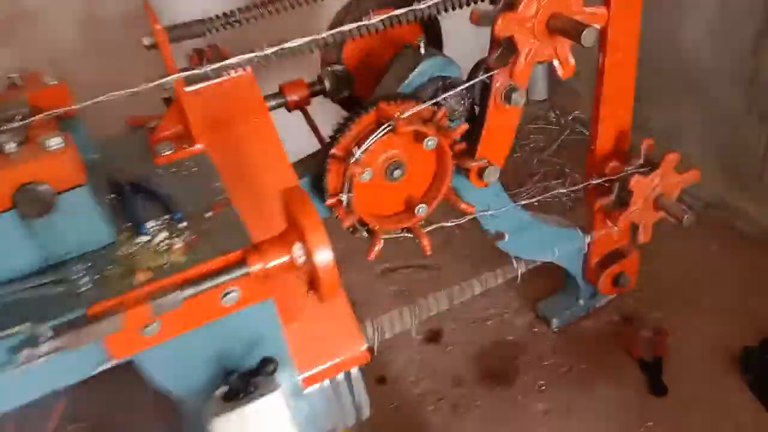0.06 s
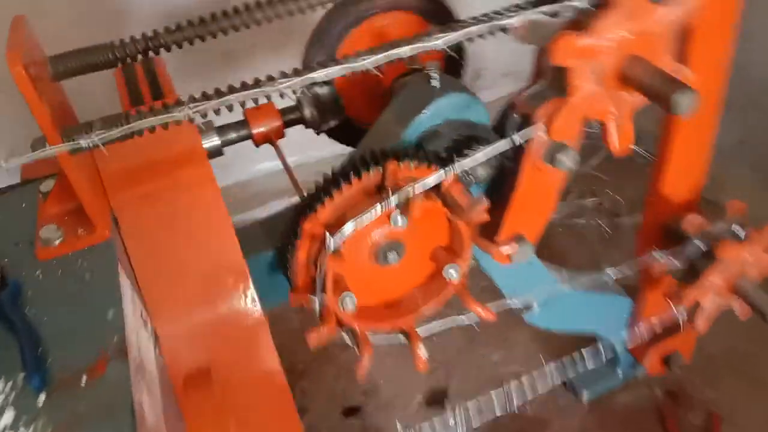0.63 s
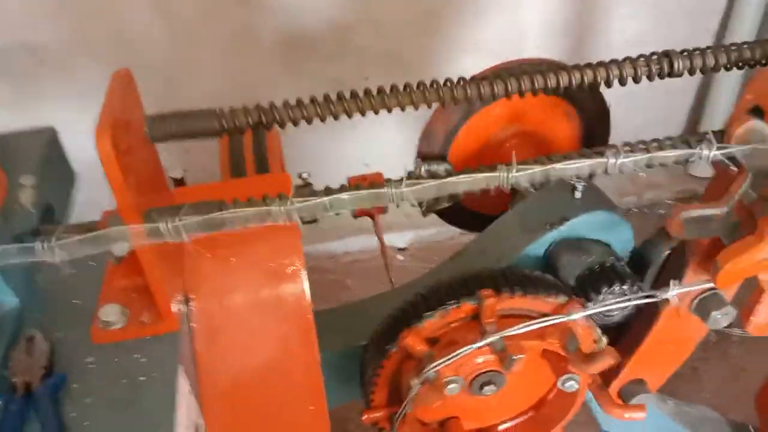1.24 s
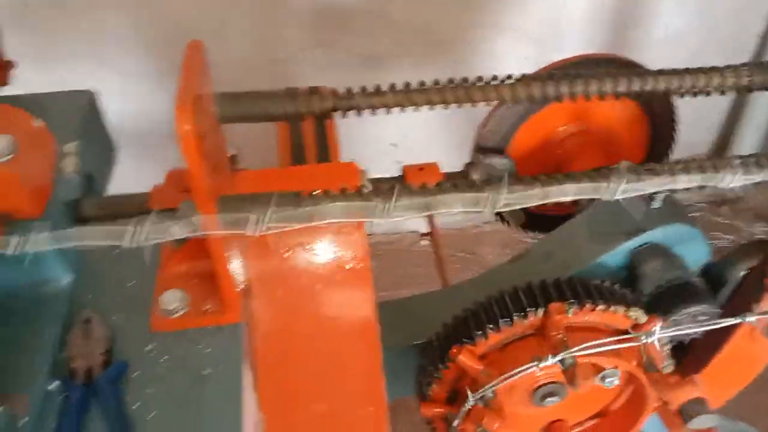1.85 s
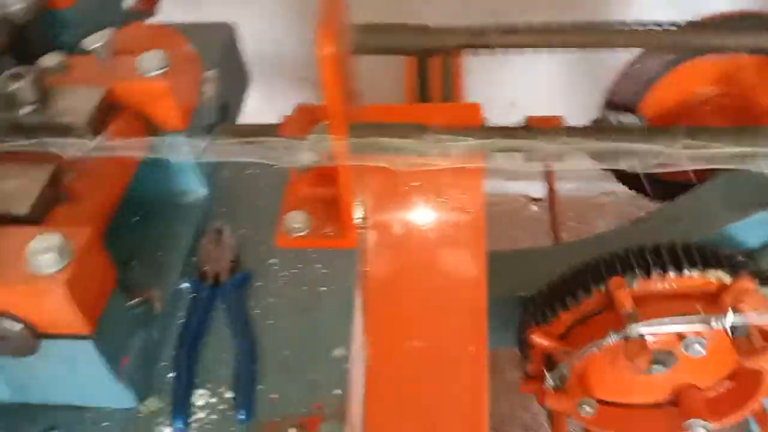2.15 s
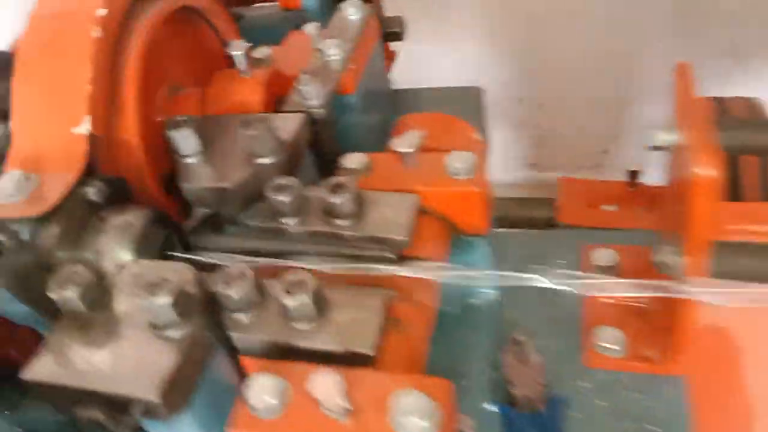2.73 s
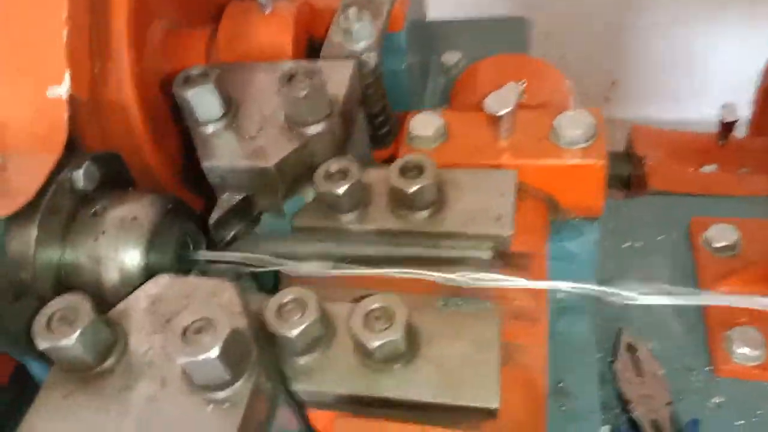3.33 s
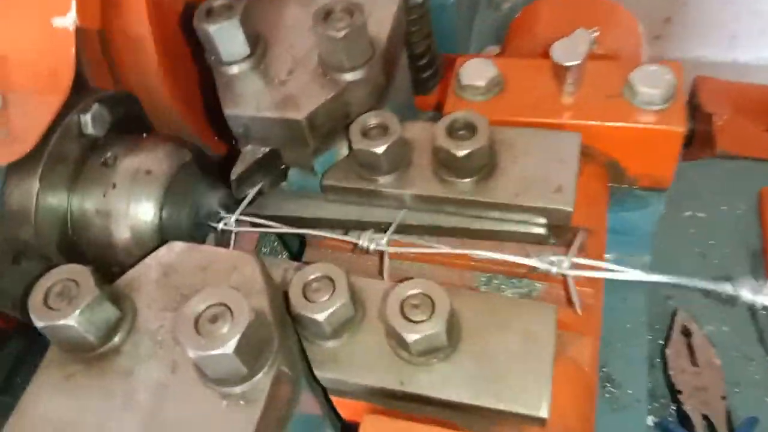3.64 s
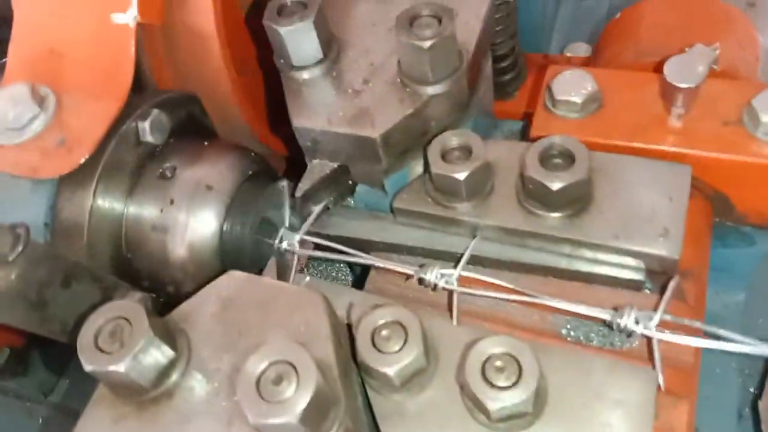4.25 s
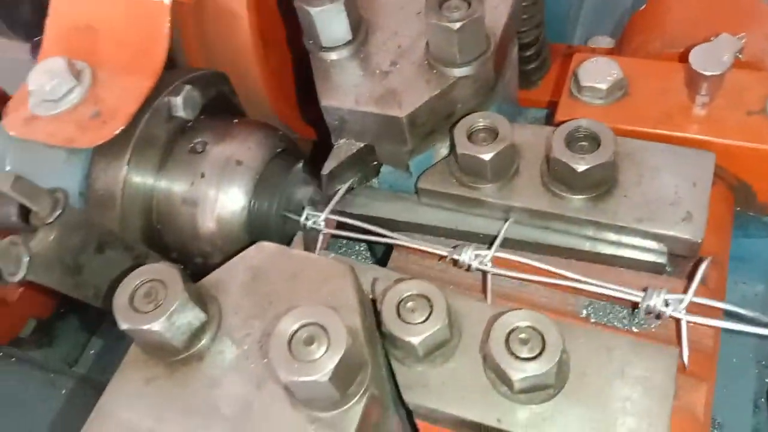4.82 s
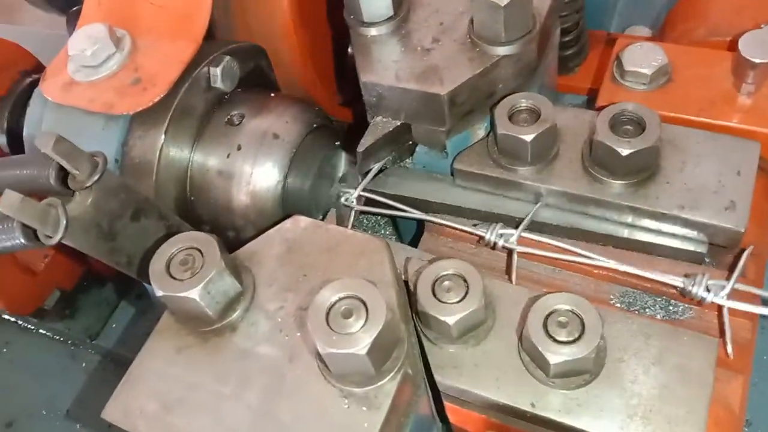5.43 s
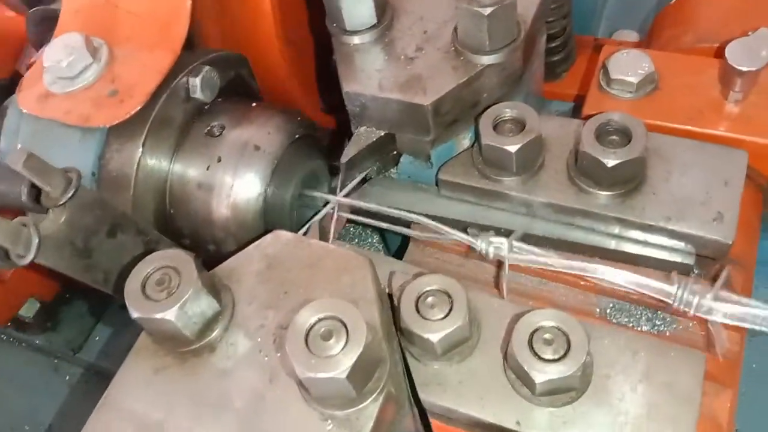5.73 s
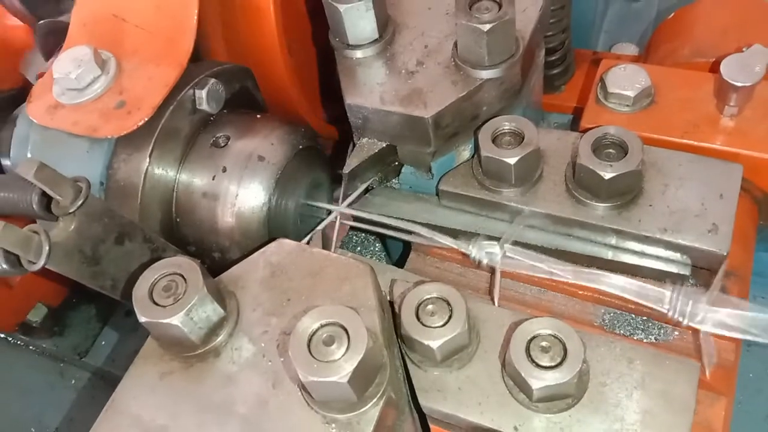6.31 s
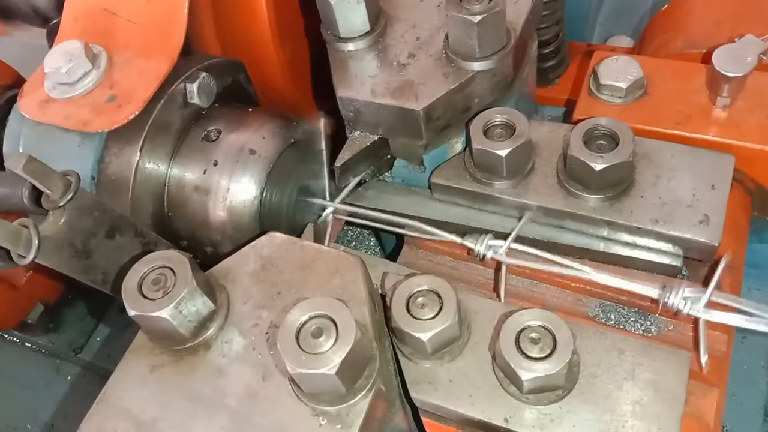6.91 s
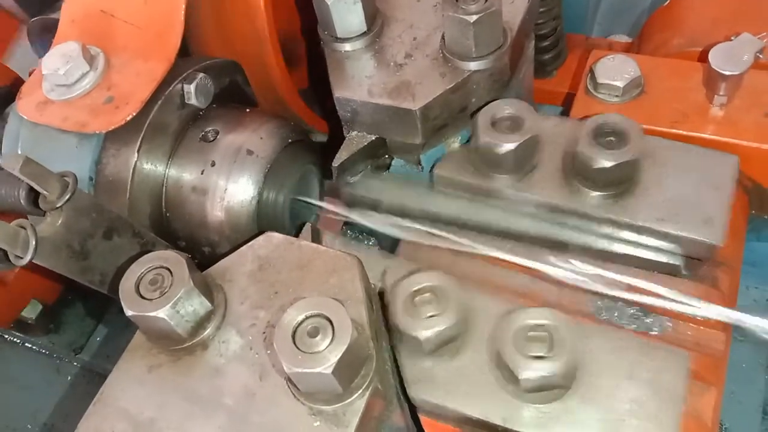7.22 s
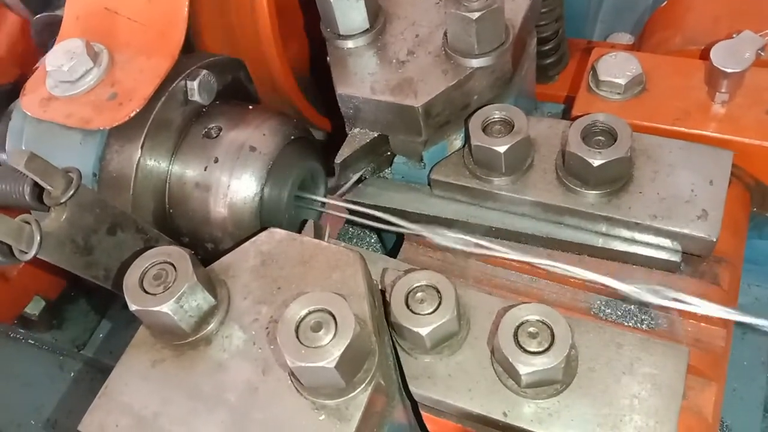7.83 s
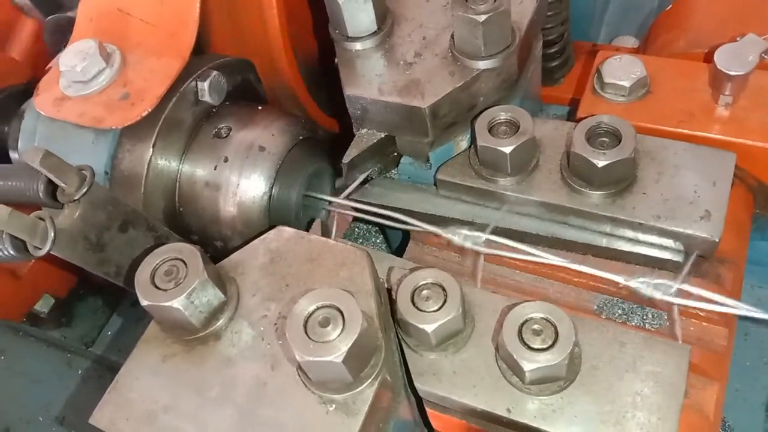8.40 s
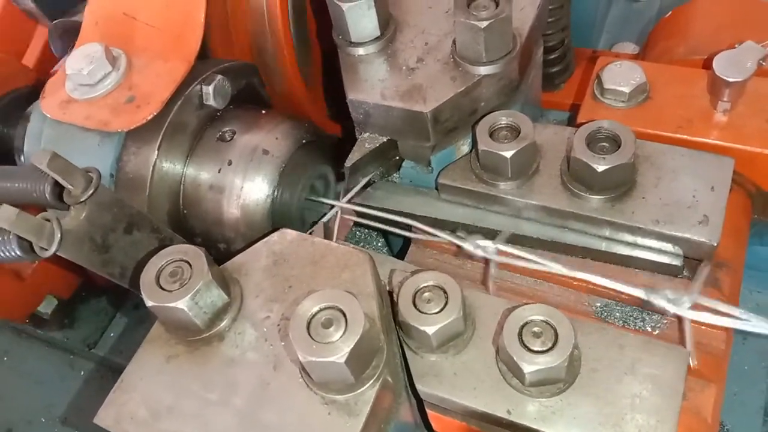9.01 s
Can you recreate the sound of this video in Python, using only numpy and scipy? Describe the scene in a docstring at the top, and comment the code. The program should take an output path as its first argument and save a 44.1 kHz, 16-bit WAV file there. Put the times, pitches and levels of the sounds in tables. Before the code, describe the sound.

A barbed wire machine runs without a break in a small workshop. Its motor rumbles and its gears grind while a group of three sharp steel clacks repeats almost twice a second, the third lighter. Between the clacks, wire scrapes with a hiss and ticks quickly round the strand. The drone eases over the first few seconds as the microphone moves from the drive end to the cutting head, leaving the close clacks more prominent.

```python
"""Barbed wire machine

In a small workshop a machine makes one barb every 0.56 s over grinding gears and a rumbling motor.
Each stroke excites the damped modes of its steel parts three times: the feed strikes, the cutter shears
and the lever drops back. Between the first two clacks the wire scrapes in and ticks round the strand.
The microphone moves from drive end to cutting head; its look-ahead limiter ducks the drone at each clack."""
import sys
import numpy as np
from scipy import signal
from scipy.fft import rfft, irfft, next_fast_len
from scipy.io import wavfile
from scipy.ndimage import uniform_filter1d, minimum_filter1d

SR = 44100
rng = np.random.default_rng(int(sys.argv[2]) if len(sys.argv) > 2 else 0)


def store_pcm(level_fs):
    """Save levels as 16-bit WAV."""
    pcm = np.round(np.clip(level_fs, -1, 1) * 32767).astype(np.int16)
    wavfile.write(sys.argv[1], SR, np.atleast_2d(pcm).T)


N = 399546
TIME = np.arange(N) / SR
FIRST_STROKE_S, STROKE_S = .2762, .55987
STROKES = (TIME - FIRST_STROKE_S) / STROKE_S

# Spectral densities of the running parts: f/Hz, relative level/dB
MOTOR_SPECTRUM = [(20, -25), (38, -13), (62, -20), (115, -3), (270, -1.5), (400, -0.5), (750, 0), (1200, 0),
                  (3000, -16), (8000, -66)]
GEAR_SPECTRUM = [(100, -38.5), (600, -13.5), (1000, -3.5), (1300, 1.5), (1680, 4), (1870, 7.5),
                 (2020, -4.5), (2200, -8), (2650, -14.5), (2950, -11), (3350, -9.5), (3900, -16.5),
                 (6000, -24), (12000, -34.5)]
SCRAPE_SPECTRUM = [(1500, -34), (3000, -10), (4100, -11), (4800, 1.5), (5400, 5), (5900, 2.5), (6650, 5.5),
                   (7500, 0), (8400, -11.5), (9800, -14), (11500, -17.5), (15200, -24)]
FIZZ_SPECTRUM = [(5000, -10), (8000, 1), (9800, 2.5), (11300, -5), (13100, 0), (14000, -4), (14900, 1),
                 (16000, -11)]
FLICK_SPECTRUM = [(2000, -47), (5000, -2), (6500, 11.5), (8500, 3.5), (9750, -6), (10900, -1), (12300, -22),
                  (13150, 7), (14000, -6), (14900, -1), (16000, -23)]
# Motor tones: f/Hz, bandwidth/Hz, level/dB relative to the rumble
HUM_TONES = [(234, 15, -19.5), (275.4, 8.7, -16), (1840, 45, -8), (2406, 10, -13)]
# Whines and parts kept ringing by the running: f/Hz, bandwidth/Hz, level/dB
WHINE_TONES = [(632, 2.2, -46), (1555, 9.4, -39), (2290, 10, -42.5), (3746, 12, -46.5), (5420, 37, -42.5)]
# Gear meshes: teeth per stroke, strength
GEAR_MESHES = [(53, .8), (86, .7)]
# Gear load as the barb is wound and the lever lifted: t/s into the stroke, half-width/s, gain/dB
LOAD_SWELLS = [(0.087, .06, 2), (0.443, 0.041, 2)]
# Friction as the wire is drawn in, wound, sheared, pulled on and set again:
# t/s into the stroke, half-width/s, scrape gain/dB, fizz gain/dB
RUB_SWELLS = [(0.072, 0.04, 9, 10), (0.168, 0.1, 2.5, 12.5), (0.32, 0.058, 6.5, 19.5),
              (0.426, 0.057, 3.5, -7), (0.516, .014, -0.5, 13.5)]
# Squeals of rubbing steel: t/s, duration/s, f/Hz, level/dB
STEEL_SQUEALS = [(.22, 0.055, 3820, -31), (2.292, 0.23, 5350, -34), (2.941, 0.076, 3746, -33),
                 (3.182, 0.083, 3746, -36), (8.843, .08, 3746, -35)]
# Modes of the struck parts: f/Hz, relative level/dB, T60/s
BARB_MODES = [(9750, -5, .02), (13100, -7, .016), (14900, -8, .016)]
CUT_END_MODES = [(4800, -29, .05), (10800, -31.5, 0.032), (12200, -30, .06)]
BED_MODES = [(105, -34, 0.018), (182, -19.5, 0.042), (332, -41, 0.014)]
FEED_MODES = [(1472, -26, 0.081), (1775, -14, 0.081), (2220, -18, 0.049), (6960, -12, 0.023),
              (10300, -19, 0.015), (12100, -23, 0.016), (14550, -19, .012)]
CUTTER_MODES = [(1874, -7.5, 0.024), (2603, -12, 0.016), (3293, -17, 0.034), (6830, -24, 0.023)]
LEVER_MODES = [(1356, -4.5, 0.019), (3196, -19.5, 0.047), (3350, -10, 0.022), (4480, -22.5, 0.054),
               (5290, -15, 0.035), (6780, -17, 0.071), (9500, -37, .04), (14700, -22, .025)]
# Dense modes of the frame, by band: lower edge f/Hz, rise time/s, T60/s before scaling
FRAME_BANDS = [(19.7, 0.0017, 0.043), (343, 0.0017, 0.037), (1033, 0.0073, 0.059), (2260, 0.0014, 0.045),
               (4580, 0.0012, 0.069), (8180, 0.0011, 0.049)]
# Spectral densities of the frame under each blow: f/Hz, relative level/dB
FEED_SPECTRUM = [(35, -21), (100, -0.5), (600, -1.5), (1000, -0.5), (1500, 7.5), (2050, 3), (2300, -9),
                 (3300, -5.5), (4000, -14), (5400, -9.5), (6900, -5.5), (8600, -15), (11500, -22.5),
                 (15200, -22)]
CUT_SPECTRUM = [(35, -25), (110, -3), (800, -1), (1400, 5), (1850, 5), (2200, -6.5), (3400, -7),
                (4000, -15.5), (5300, -11), (6200, -14.5), (6800, -6.5), (8600, -19.5), (12000, -25.5),
                (15000, -22)]
LEVER_SPECTRUM = [(35, -12), (110, -1), (800, 1.5), (1350, 6.5), (1850, 9.5), (2200, -3), (3000, -1.5),
                  (3330, 1), (3800, -14.5), (5300, -12.5), (6800, -7), (8600, -14), (12000, -21),
                  (15000, -33)]
# Contacts within one clack: delay/s, relative level/dB
FEED_CONTACTS = [(.0005, 10.5), (.004, 1), (.009, 0.5), (.015, -5.5)]
CUT_CONTACTS = [(.0005, 9.4), (.008, 2.2), (0.0187, 6.9), (.027, 2), (0.0343, 4.5)]
LEVER_CONTACTS = [(.0005, 10), (0.014, -0.5)]
# Knocks of the cam taking up its slack just before a cut: t/s, relative level/dB
SLACK_KNOCKS = [(4.408, -1), (6.087, -10), (7.208, -11), (7.768, -8), (8.328, -4)]


def amp(db):
    """Amplitude grows tenfold for every 20 dB."""
    return 10 ** (np.asarray(db) / 20)


def unit(x):
    """Normalisation to rms 1."""
    return x / np.sqrt(np.mean(x ** 2) + 1e-20)


def convolve(x, response):
    """A linear system's output: convolution with its impulse response, cut to the scene."""
    return signal.oaconvolve(x, response)[:N]


def colour(x, spectrum, size=8192):
    """A minimum-phase filter imposes a spectrum and conserves the power of white noise."""
    hz, db = np.transpose(spectrum)
    log_f = np.log(abs(np.fft.fftfreq(size, 1 / SR)) + 1)
    gain = unit(amp(np.interp(log_f, np.log(hz), db)))
    transfer = np.exp(np.conj(signal.hilbert(np.log(gain))))
    return convolve(x, np.fft.ifft(transfer).real[:size // 2])


def narrow_noise(hz, width_hz):
    """Narrow-band noise of rms 1; centred on 0 Hz it is a random fluctuation."""
    size = next_fast_len(N)
    detuning = (np.fft.rfftfreq(size, 1 / SR) - hz) / (width_hz / 2)
    return unit(irfft(rfft(rng.standard_normal(size)) / (1 + detuning ** 2), size)[:N])


def ringing(modes):
    """An impulse response is a sum of damped sinusoids, one for each mode."""
    t = np.arange(SR // 10) / SR
    return sum(amp(db - 60 * t / t60) * np.sin(2 * np.pi * hz * t) for hz, db, t60 in modes)


def add(mix, s, sound):
    """Superposition of a sound starting at time s, if that lies within the scene."""
    if s >= 0:
        part = mix[round(s * SR):][:len(sound)]
        part += sound[:len(part)]


def heard_db(s, head_db, drive_db, walk_s=1.82):
    """Level depends on position: head_db at the cutting head, drive_db more at the drive end."""
    return head_db + drive_db * np.exp(-np.maximum(s, 0) / walk_s)


def each_stroke(into_s, head_db=0, drive_db=0):
    """A periodic event, once a stroke: t/s, level/dB."""
    s = FIRST_STROKE_S + STROKE_S * np.arange(-1, N / SR / STROKE_S) + into_s
    return np.column_stack([s, heard_db(s, head_db, drive_db)])


def contacts(events, pattern, jitter_s, spread_db):
    """A pattern of contacts follows each event with Gaussian scatter: t/s, level/dB."""
    rows = (np.array(events)[:, None] + np.array(pattern)).reshape(-1, 2)
    return rows + rng.standard_normal(rows.shape) * [jitter_s, spread_db]


def swells(into_s, half_s, db, variety=0.27):
    """Amplitude modulation in dB: Gaussian swells recur each stroke, never equally high."""
    apart_s = ((STROKES - into_s[:, None] / STROKE_S + .5) % 1 - .5) * STROKE_S
    return db @ np.exp(-(apart_s / half_s[:, None]) ** 2) * (1 + variety * narrow_noise(0, 3.2))


def workshop(x, wet_db=-18, low_hz=700, t60=.55, treble_t60=.3):
    """Reverberation: bare walls return a short, thin tail whose treble decays first."""
    t = np.arange(SR // 2) / SR
    noise = rng.standard_normal(len(t)) * (t > .008)
    noise = signal.sosfilt(signal.butter(2, low_hz, "high", fs=SR, output="sos"), noise)
    middle = signal.sosfilt(signal.butter(2, 5000, fs=SR, output="sos"), noise)
    tail = middle * amp(-60 * t / t60) + (noise - middle) * amp(-60 * t / treble_t60)
    return x + amp(wet_db) * convolve(x, tail / np.linalg.norm(tail))


def whines(tones):
    """Forced vibration: steady running sustains narrow bands of sound."""
    return sum(amp(db) * narrow_noise(hz, width) for hz, width, db in tones)


def motor(load_db):
    """A broadband rumble that rises with load, and a narrow-band hum."""
    rumble = amp(0.32 * load_db) * colour(rng.standard_normal(N), MOTOR_SPECTRUM)
    return amp(heard_db(TIME, head_db=-33, drive_db=9.1)) * (rumble + whines(HUM_TONES))


def gears(load_db):
    """Meshing teeth modulate grinding noise at the tooth-passing rates."""
    phase = STROKES + 0.0017 * narrow_noise(0, 9.4)  # backlash: teeth land early or late
    teeth = sum(strength * np.exp(-(phase * count % 1) / 0.21) for count, strength in GEAR_MESHES)
    uneven = amp(narrow_noise(0, 55))
    grind = unit((1.9 + teeth) * uneven * rng.standard_normal(N))
    return amp(heard_db(TIME, head_db=-23.5, drive_db=4.9) + load_db) * colour(grind, GEAR_SPECTRUM)


def wire_friction(turns_per_stroke=15):
    """Sliding friction makes a scrape and a fizz; the scrape pulses as the wire presses once a turn."""
    into_s, half_s, scrape_db, fizz_db = np.transpose(RUB_SWELLS)
    scrape_gain = amp(heard_db(TIME, head_db=-33.5, drive_db=4.7) + swells(into_s, half_s, scrape_db))
    fizz_gain = amp(heard_db(TIME, head_db=-55, drive_db=1) + swells(into_s, half_s, fizz_db))
    pressure = 1 + .5 * np.exp(-(STROKES * turns_per_stroke % 1) / 0.65)
    grit = amp(0.43 * narrow_noise(0, 500))
    scrape = colour(unit(pressure * grit * rng.standard_normal(N)), SCRAPE_SPECTRUM)
    fizz = colour(unit(grit * rng.standard_normal(N)), FIZZ_SPECTRUM)
    return scrape_gain * scrape + fizz_gain * fizz


def squeals():
    """Friction-induced vibration: rubbing drives a steel part into a brief, nearly pure tone."""
    tones = np.zeros(N)
    for s, length, hz, db in STEEL_SQUEALS:
        t = np.arange(round(length * SR)) / SR
        add(tones, s, amp(db) * np.sin(np.pi * t / length) * np.sin(2 * np.pi * hz * t))
    return tones * amp(2.2 * narrow_noise(0, 40))


def wire_end(modes, spread):
    """Natural frequencies depend on length, so no two wire ends ring alike."""
    return ringing([(hz * (1 + spread * rng.standard_normal()), db, t60) for hz, db, t60 in modes])


def winding(turns=4, first_s=.0955, turn_s=.0385, growth_db=.5):
    """Impact excitation: both barb ends flick past the guide, harder each turn, and scratch and ring."""
    ends = [(0, -21), (.0135, -31)]  # delay/s, relative level/dB
    flicks = [(first_s + turn * turn_s + delay_s, db + turn * growth_db)
              for turn in range(turns) for delay_s, db in ends]
    t = np.arange(SR // 25) / SR
    envelope = t / 0.0025 * np.exp(1 - t / 0.0022)
    scratches, zings = np.zeros((2, N))
    for s, db in contacts(each_stroke(0), flicks, jitter_s=.0012, spread_db=2.5):
        add(scratches, s, amp(db - 3) * envelope * rng.standard_normal(len(t)))
        add(zings, s + 0.00093, amp(db + 1.5) * wire_end(BARB_MODES, spread=.018))
    return colour(scratches, FLICK_SPECTRUM) + zings


def pings():
    """Free vibration of the wire end after each cut."""
    sound = np.zeros(N)
    for s, db in contacts(each_stroke(0), [(.376, -3)], jitter_s=.001, spread_db=3):
        add(sound, s, amp(db) * wire_end(CUT_END_MODES, spread=.006))
    return sound


def clacks(events, bounces, spectrum, modes, bed_db, t60_scale):
    """Impacts excite discrete modes of part and bed; the frame's dense modes ring as decaying noise."""
    t = np.arange(SR // 5) / SR
    edge_hz, rise, t60 = np.transpose(FRAME_BANDS)
    band = np.searchsorted(edge_hz, np.fft.rfftfreq(len(t), 1 / SR)) - 1
    masks = band == np.arange(len(FRAME_BANDS))[:, None]
    envelopes = (1 - np.exp(-t / rise[:, None])) * amp(-60 * t / (t60[:, None] * t60_scale))
    frame, taps = np.zeros((2, N))
    for s, db in contacts(events, bounces, jitter_s=.0003, spread_db=3):
        noise_bands = irfft(rfft(rng.standard_normal(len(t))) * masks, len(t))
        add(frame, s, amp(db) * (noise_bands * envelopes).sum(0))
        add(taps, s, amp([db]))
    return colour(frame, spectrum) + convolve(taps, ringing(modes) + amp(bed_db) * ringing(BED_MODES))


def scene():
    """Superposition of reverberant impacts and the running machine, alike in both channels."""
    feeds = each_stroke(0, head_db=-0.54, drive_db=-0.46)
    cuts = each_stroke(.2403, head_db=-0.5, drive_db=-4)
    drops = each_stroke(.3432, head_db=-6, drive_db=-1.6)
    feed = clacks(feeds, FEED_CONTACTS, FEED_SPECTRUM, FEED_MODES, bed_db=-4, t60_scale=0.93)
    cam = clacks(SLACK_KNOCKS, [(0, -7.5)], CUT_SPECTRUM, CUTTER_MODES, bed_db=9, t60_scale=0.5)
    cut = clacks(cuts, CUT_CONTACTS, CUT_SPECTRUM, CUTTER_MODES, bed_db=-4, t60_scale=0.79)
    lever = clacks(drops, LEVER_CONTACTS, LEVER_SPECTRUM, LEVER_MODES, bed_db=-8, t60_scale=0.88)
    impacts = workshop(feed + cam + cut + lever + winding() + pings())
    load_db = swells(*np.transpose(LOAD_SWELLS))
    drone = whines(WHINE_TONES) + motor(load_db) + gears(load_db)
    sound = drone + wire_friction() + squeals() + impacts
    return np.array([sound, sound])


def record(dry, threshold_db=-12, ahead_s=0.0069, low_cut_hz=55, high_cut_hz=15550):
    """Look-ahead limiting in a finite band: gain falls before a clack, then recovers in two stages."""
    heard = signal.sosfilt(signal.butter(3, low_cut_hz, "high", fs=SR, output="sos"), dry)
    power_db = 10 * np.log10(abs(uniform_filter1d(heard[0] ** 2, size=100)) + 1e-12)
    ahead = round(ahead_s * SR)
    over_db = np.maximum(power_db - threshold_db, 0)
    coming_db = -minimum_filter1d(-over_db, ahead, origin=-(ahead // 2))
    quick, slow = (np.maximum.accumulate(share * coming_db + TIME * recovery) - TIME * recovery
                   for share, recovery in [(1, 330), (0.57, 80)])
    duck_db = .88 * uniform_filter1d(np.maximum(quick, slow), size=200)
    clipped = np.clip(heard * amp(-duck_db), -.85, .85)
    low_pass = signal.firwin(601, high_cut_hz, window=("kaiser", 9), fs=SR)
    return signal.oaconvolve(clipped, low_pass[None], "same")


dry = scene()
out = record(dry)
store_pcm(out)
```